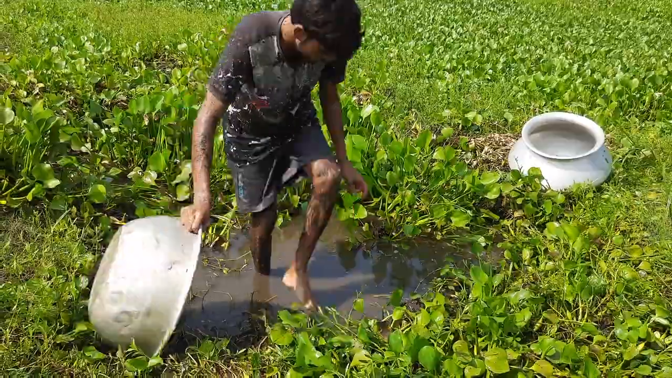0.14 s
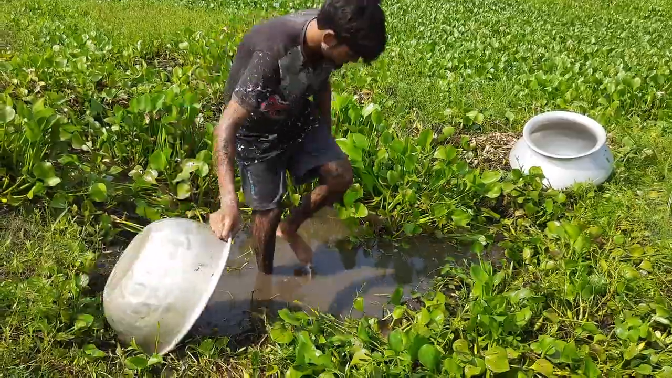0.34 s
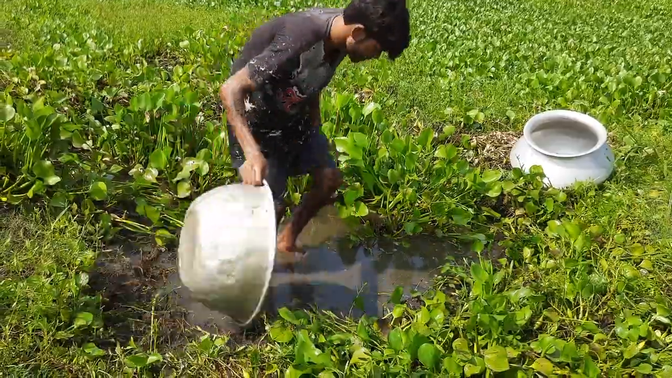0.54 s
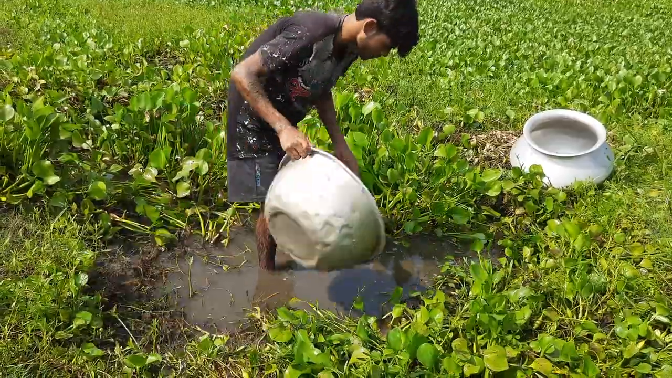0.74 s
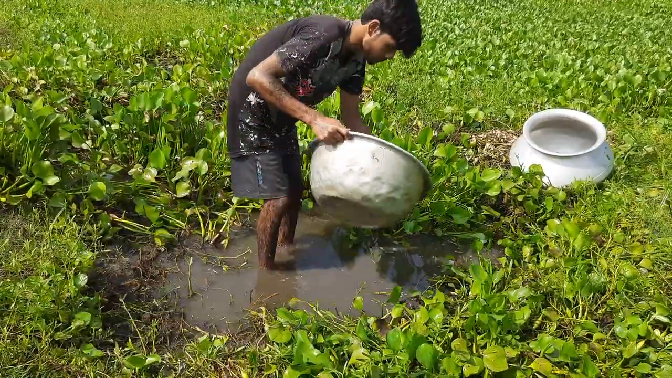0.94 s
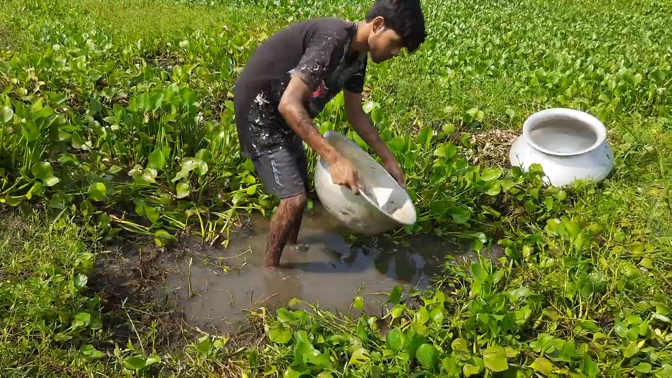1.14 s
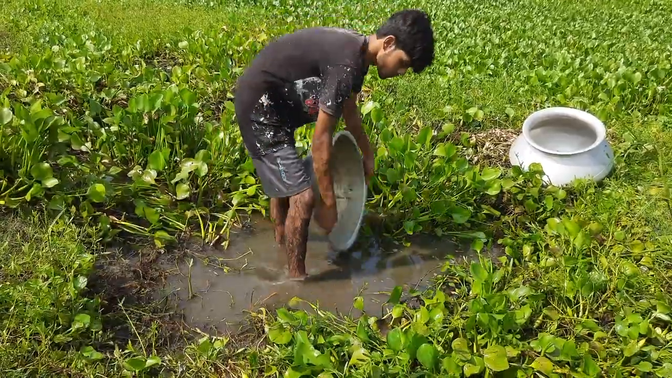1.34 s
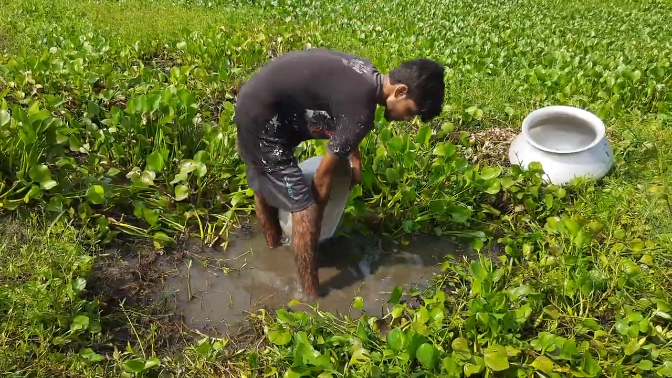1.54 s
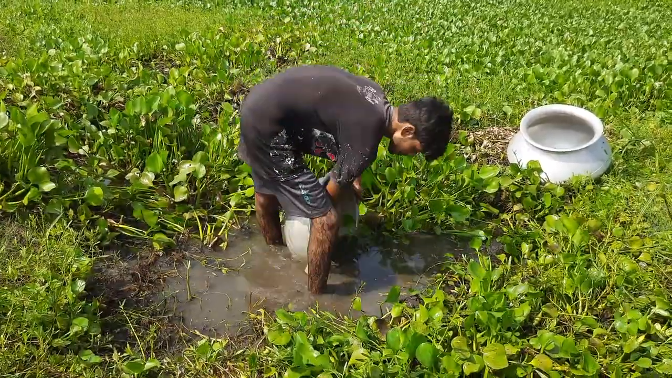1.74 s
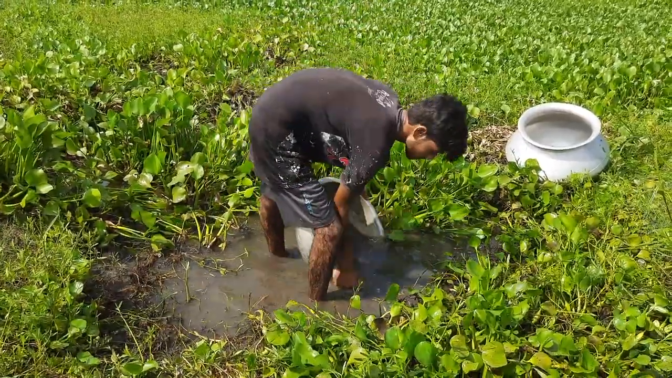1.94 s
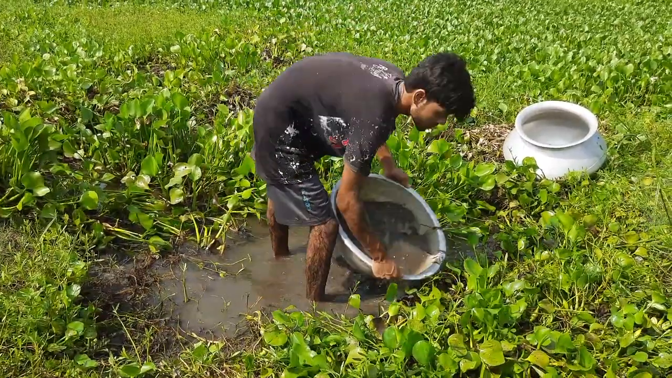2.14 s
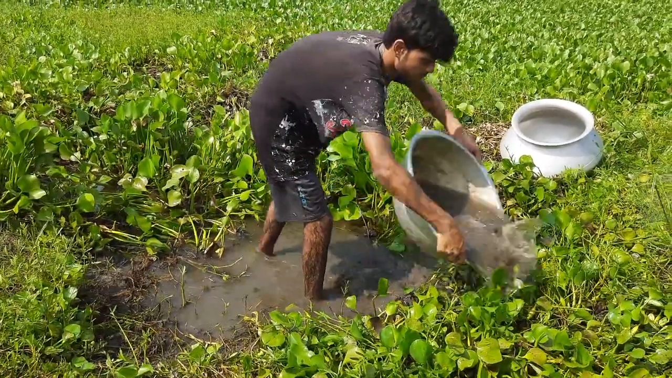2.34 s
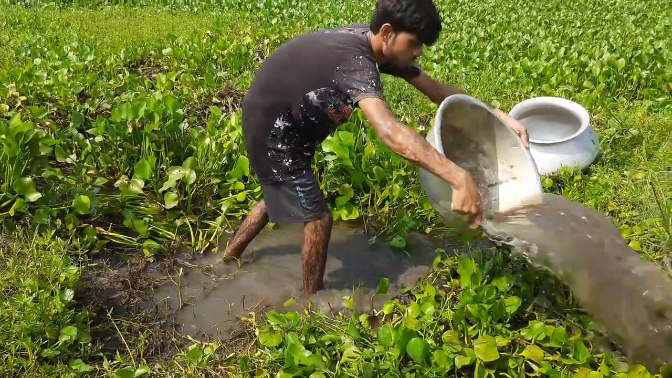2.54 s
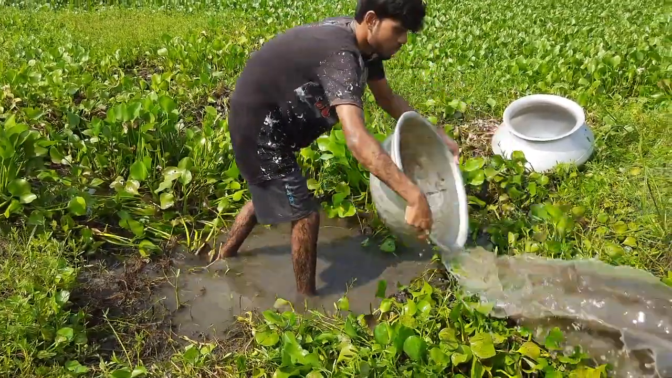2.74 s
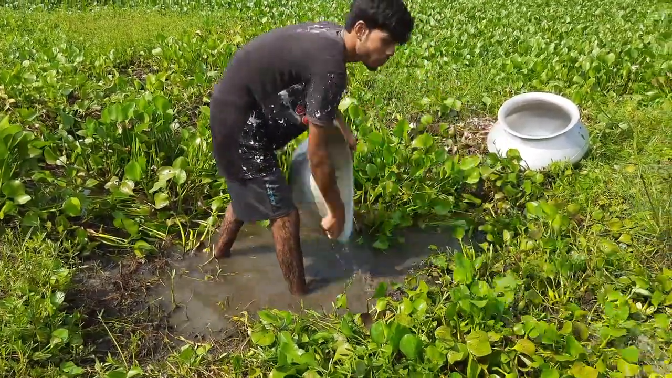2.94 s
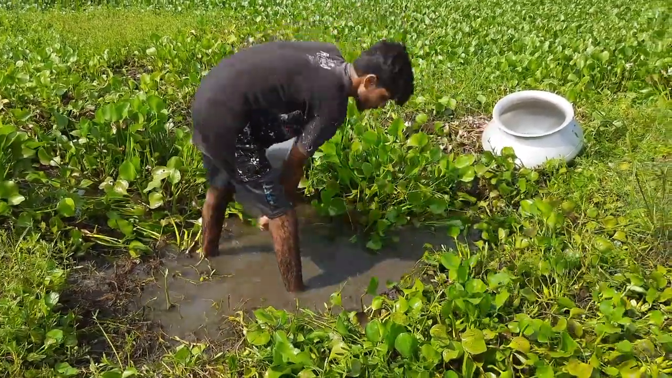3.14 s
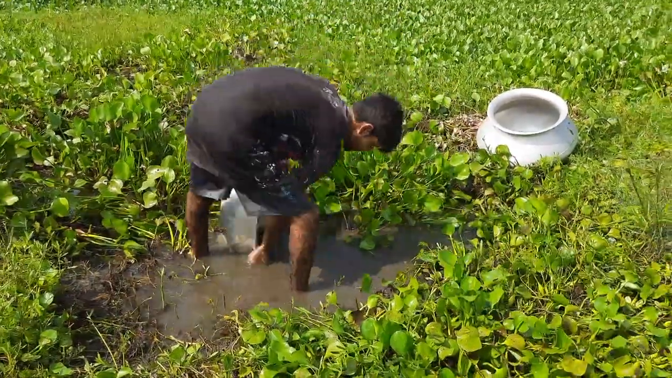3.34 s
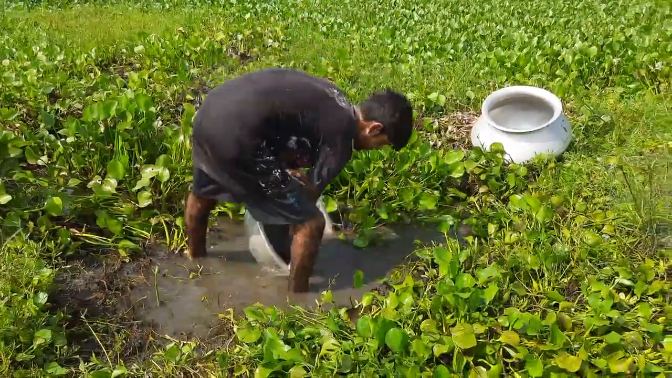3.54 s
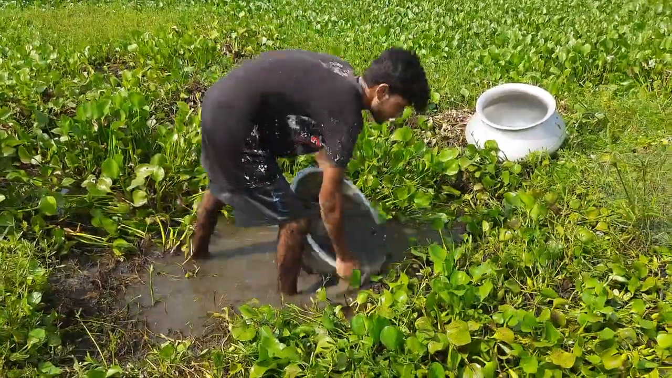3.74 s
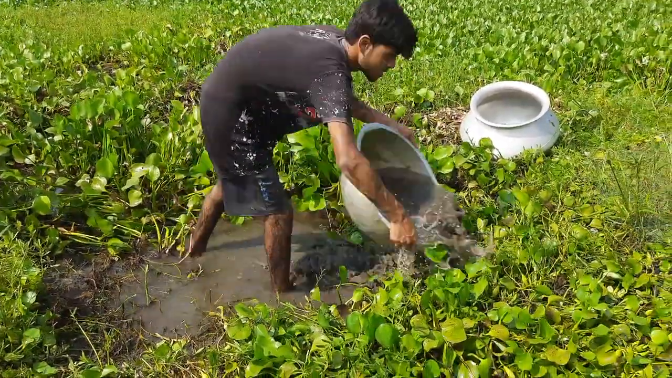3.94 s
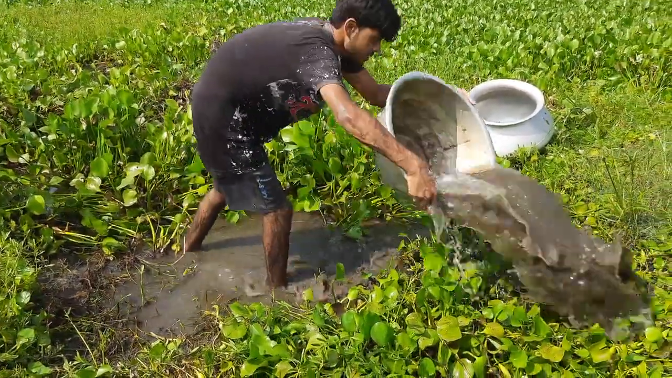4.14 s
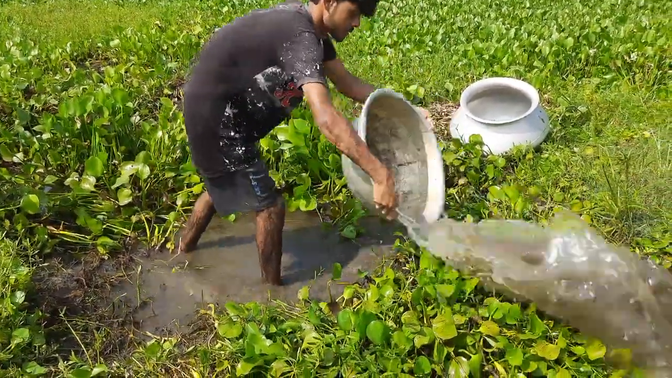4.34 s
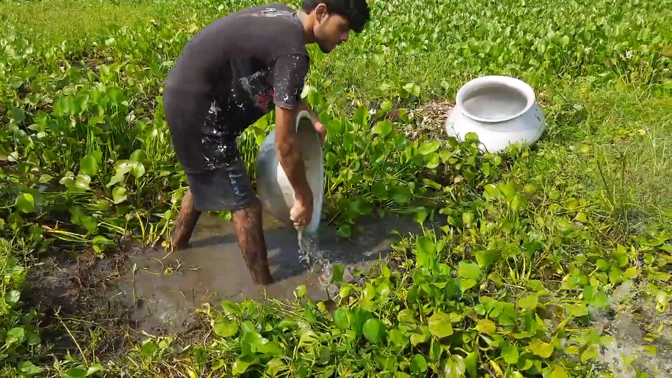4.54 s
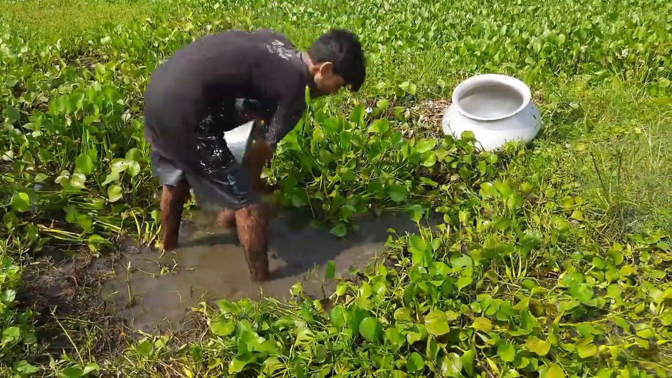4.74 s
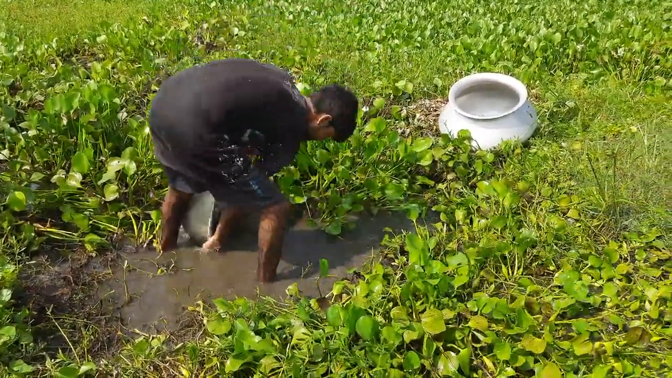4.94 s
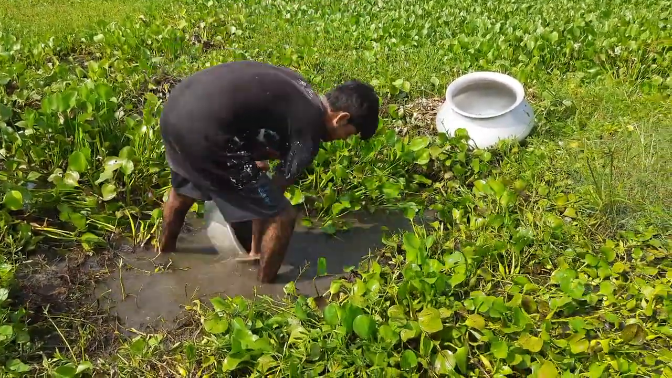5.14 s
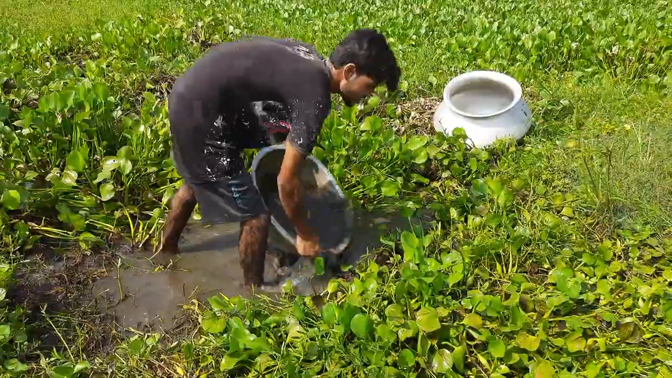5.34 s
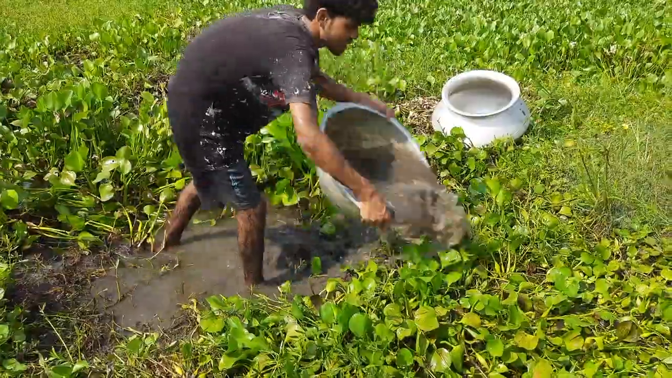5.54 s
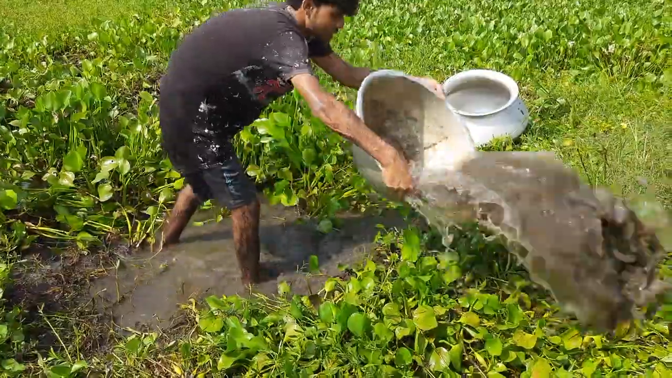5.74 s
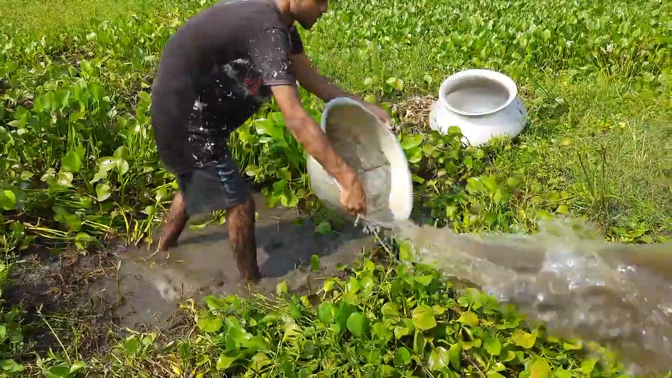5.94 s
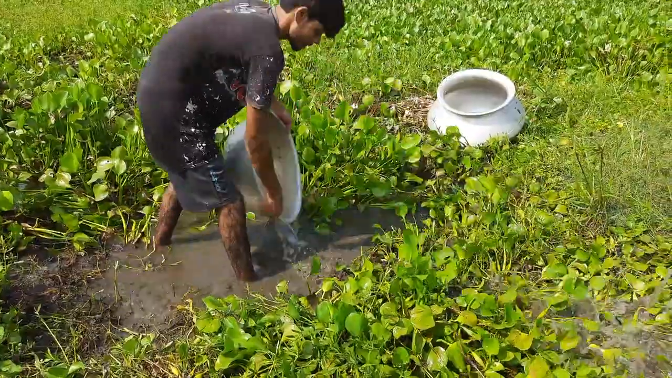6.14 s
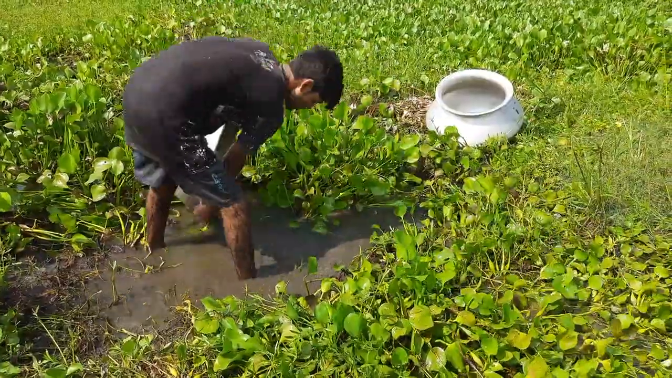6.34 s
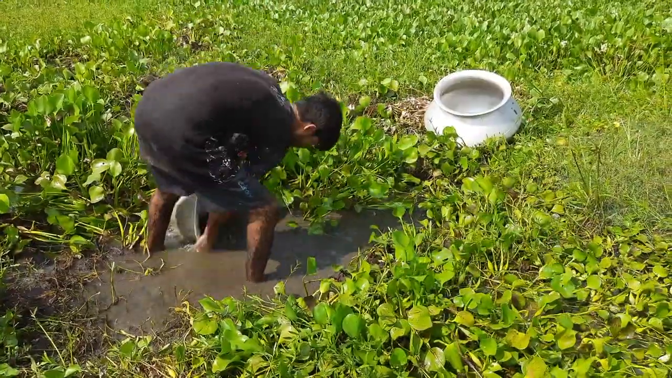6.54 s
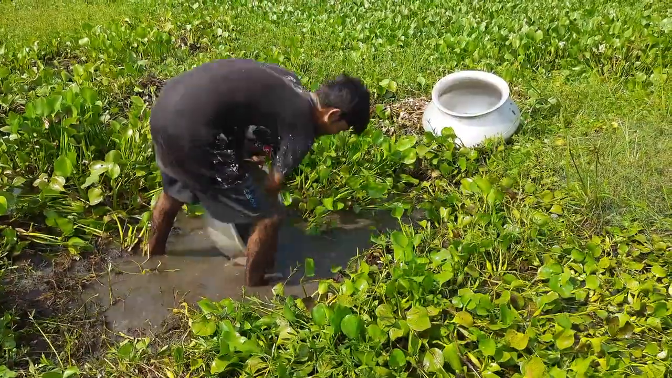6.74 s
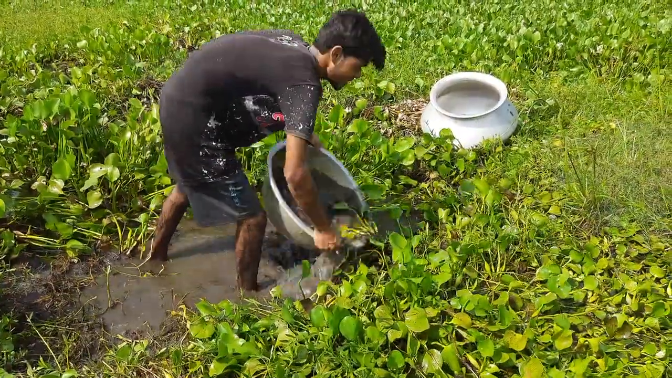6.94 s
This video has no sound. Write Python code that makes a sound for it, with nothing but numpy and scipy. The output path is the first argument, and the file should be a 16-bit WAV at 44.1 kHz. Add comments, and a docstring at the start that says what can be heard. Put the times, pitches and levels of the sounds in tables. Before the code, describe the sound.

Open country air with a faint hush, low uneven wind bumping the microphone and a few tiny far bird whistles in the first quarter second. From 0.4 s feet shift softly in mud; around 0.8 s the empty thin metal basin knocks dully, with lighter taps at 1.2 and 1.8 s among small wet slaps. At about 2.0 s the rim digs in and water gurgles into it; at 2.4 s it slops over with ringing plops. A sheet of water swells from 2.8 s, rattles over broad leaves and slams down near 3.0 s, draining in hissing spatter. The second scoop bubbles at 3.6 s, slops at 3.95 s and lands heavily at 4.6 s. The third dips at 5.15 s, spills at 5.6 s and crashes at 6.15 s, the loudest spray. Bird chirps return from 6.5 s as a fourth dip gurgles at 6.7 s and slops at 7.1 s. Close, dry stereo.

```python
"""A shallow muddy pool outdoors: someone stands in it and bails it out with an aluminium basin.
The empty basin knocks, then dips, fills and slops over: metal modes, and bubble clouds over noise.
Three loads are thrown: each sheet rattles over broad leaves, slams down and drains away.
Slaps are noise bursts, plops and dull thuds single rising rings; a far bird whistles over a hush
and low wind."""
import sys
import numpy as np
from scipy import signal
from scipy.fft import rfft, irfft, next_fast_len
from scipy.io import wavfile
from scipy.ndimage import uniform_filter1d, map_coordinates

SR = 44100
rng = np.random.default_rng(int(sys.argv[2]) if len(sys.argv) > 2 else 0)


def unload_wav(signal):
    """Save mono or channel-first audio to the path in sys.argv[1] as 16-bit WAV at rate SR, clipped to [-1, 1]."""
    wavfile.write(
        sys.argv[1],
        SR,
        np.round(np.clip(np.atleast_2d(signal).T, -1, 1) * 32767).astype(np.int16),
    )


N = 312669

# Wind at the microphone. Each row: time in seconds, relative level in dB.
WIND_LEVELS = [(0.0, -59), (0.75, -52.5), (1.64, -51), (1.87, -44), (2.41, -54), (2.74, -44.5), (3.41, -53),
               (4.6, -53.5), (4.82, -57), (5.13, -52.5), (5.45, -62), (6.0, -62), (6.16, -56),
               (6.71, -57.5), (6.99, -53.5), (7.09, -60)]
# Bird notes. Each row: start in seconds, length in seconds, start pitch in Hz, level in dB.
CHIRPS = [(0.015, 0.015, 2850, -50), (.053, .03, 2820, -43.5), (0.072, .022, 2480, -54),
          (.156, .035, 2520, -57), (.226, 0.06, 2480, -60), (6.546, .025, 2870, -42),
          (6.798, 0.048, 2950, -43.5), (6.88, 0.078, 2960, -49), (7.012, .02, 2660, -39.5)]
# Feet shifting in mud and wet weeds, and the basin touching the water.
# Each row: start in seconds, length in seconds, relative level in dB, extra gurgle in dB.
STEPS = [(.43, 0.17, -0.5, -11), (0.652, 0.15, 2, -6), (1.15, 0.17, -6.5, 4), (1.488, 0.025, 0.5, 3.5),
         (1.596, 0.089, 7.5, -5.5), (1.754, 0.025, 2, 6), (4.894, 0.28, 8, -23)]
# The rim digs in and water rushes into the basin.
# Each row: start in seconds, filling in seconds, relative level in dB, extra gurgle in dB.
DIPS = [(1.97, 0.19, -4, -4), (3.59, 0.089, 2, -0.5), (5.14, 0.079, 0.5, 0.5), (6.709, 0.017, 0, 1)]
# The full basin is swung up and slops over.
# Each row: start in seconds, spilling in seconds, relative level in dB, extra gurgle in dB.
SPILLS = [(2.37, 0.072, -5.5, -8), (3.949, 0.061, 1.5, 0), (5.569, 0.17, -0.3, 4.5), (7.07, .05, -8, -8)]
# Single bubbles and gulps; the lowest are dull thuds of feet or bumps of wind.
# Each row: start in seconds, relative peak in dB, pitch in Hz, life in cycles.
PLOPS = [(0.447, -26.5, 91, 7), (.872, -15, 105, 2.4), (1.658, -19.5, 245, 8.6), (1.837, -33, 1340, 14),
         (1.946, -28, 190, 10.6), (2.121, -29.5, 140, 5.6), (2.207, -27, 90, 7.3), (2.415, -14.5, 1290, 25),
         (2.464, -28, 1124, 23), (2.491, -30.5, 1420, 33), (2.656, -24, 93, 4.7), (2.931, -15, 1400, 35),
         (2.988, -7.5, 1390, 18), (3.55, -29.5, 313, 32), (3.584, -18.5, 677, 17), (3.716, -24, 730, 14),
         (3.86, -20.5, 195, 8), (4.5, -17.5, 296, 12), (5.077, -25, 1070, 13), (5.219, -27.5, 235, 7.7),
         (5.268, -28.5, 346, 18), (5.575, -28, 544, 16), (5.605, -23, 303, 15), (5.635, -20.5, 1020, 20),
         (5.924, -18, 985, 17), (6.722, -22.5, 606, 26), (6.74, -29, 606, 33)]
# Slaps of feet, basin and thrown water.
# Each row: start in seconds, relative peak in dB, centre in Hz, t60 in seconds.
SLAPS = [(.668, -39, 6000, .045), (.721, -34, 3020, 0.11), (0.761, -30, 500, .045), (.811, -33, 300, 0.031),
         (1.179, -30.5, 990, 0.11), (1.248, -41, 3400, .11), (1.739, -30.5, 600, 0.19),
         (1.766, -27, 1010, 0.11), (1.968, -31, 890, 0.16), (2.385, -31.5, 2980, 0.18),
         (3.417, -33.5, 2020, 0.33), (3.585, -26.5, 990, .17), (3.715, -26.5, 2500, .06),
         (3.861, -23.5, 350, 0.17), (4.137, -26, 400, .09), (4.207, -24, 1590, .17),
         (5.003, -26.5, 3820, 0.058), (5.075, -30, 1790, 0.11), (5.154, -17.5, 1200, 0.11),
         (5.392, -32, 1410, .06), (5.721, -25.5, 865, 0.23), (5.839, -27.5, 3600, 0.071),
         (5.999, -20, 700, 0.083), (6.5, -27, 4030, 0.056)]
# Knocks on the basin. Each row: start in seconds, relative level in dB, brightest register in Hz,
# share of the ring time left by the hands.
KNOCKS = [(.762, -25, 600, .2), (.811, -15, 300, 1), (.813, -20.5, 1000, .7), (1.18, -31.5, 1900, .95),
          (1.249, -27.5, 1000, .6), (1.768, -34, 1400, .8), (2.36, -27, 1400, .2)]
# Modes of the basin. Each row: pitch in Hz, relative level in dB, undamped t60 in seconds.
BASIN_MODES = [(200, -2, .07), (248, 0, .08), (323, 1, .21), (463, -10, .15), (571, -7, .3), (640, -12, .1),
               (781, -13, .13), (935, -4, .18), (1010, -14, .22), (1160, -14, .16), (1303, -9, .16),
               (1365, -7, .17), (1495, -10, .27), (1560, -14, .18), (2150, -22, .15), (3386, -25, .1)]
# Loads thrown on the plants. Each row: landing of the bulk in seconds, relative sheet level in dB,
# pouring before it in seconds, run-off after it in seconds, extra heavy water in dB.
THROWS = [(2.973, -0.76, .19, 0.31, -2.1), (4.567, -0.67, 0.31, 0.23, -0.94), (6.155, 0.96, 0.2, .39, -1.5)]
# Landing of each load's bulk, in the order of THROWS. Each row: relative level in dB,
# air pocket pitch in Hz, relative ground thump in dB, spatter in dB.
LANDINGS = [(-10.8, 250, -23, -22), (-10.3, 232, -21, -20), (-11.3, 340, -16, -18.5)]

# Spectra. Each row: frequency in Hz, relative level in dB.
AIR_SPECTRUM = [(88, -4.5), (150, -0.5), (201, -14), (466, -12), (578, -12.5), (1100, -32), (2100, -24),
                (2400, -19), (2870, -23.5), (3620, -24), (4410, -23), (5460, -25.5), (7620, -25),
                (9260, -32), (16000, -32.5)]
WIND_SPECTRUM = [(12, -32), (20, -40), (54, 2), (102, 5), (130, 0), (200, -14), (260, -4), (440, -120)]
GURGLE_SPECTRUM = [(76, -37), (130, -9), (155, -10), (193, -9.5), (312, 4.5), (417, -6.5), (558, -5),
                   (610, 4), (900, -9), (1170, -42), (1980, -120)]
SPLASH_SPECTRUM = [(470, 4), (800, -2), (933, 0.5), (1150, -4), (1390, 1.5), (1590, 0), (1830, -25),
                   (2100, -30), (2730, -38), (4620, -120)]
FIZZ_SPECTRUM = [(1120, -3.5), (1900, -5.5), (2170, -2), (2270, 1), (2440, -11), (2740, -0.5), (2990, -10),
                 (3360, -0.5), (3770, -10.5), (4280, -7.5), (7170, -11.5), (8800, -27.5), (11600, -16.5),
                 (15000, -15), (16000, -27)]
MASS_SPECTRUM = [(53, -28), (90, 0), (150, -6.5), (247, -1), (389, -3), (433, -6), (525, -0.5), (900, -11),
                 (1170, -14), (1980, -120)]
SPLATTER_SPECTRUM = [(470, -11), (800, -1.5), (940, 3), (1250, -4), (1490, 4), (1780, -6.5), (2100, -7),
                     (2730, -14), (4620, -120)]
SPRAY_SPECTRUM = [(1120, -7), (1900, -5), (2530, -6), (2860, -1.5), (3220, -5.5), (3580, -3), (4090, -5),
                  (4430, -4.5), (5340, -5.5), (7500, -11), (9210, -24.5), (12100, -12), (15200, -13.5),
                  (16000, -14.5)]
IMPACT_SPECTRUM = [(40, -48), (120, 2), (220, 6), (400, 7), (520, -9), (900, -9), (1500, -19), (2200, -16),
                   (6000, -57)]
SPATTER_SPECTRUM = [(100, 6), (400, 7.5), (1000, 0.5), (1550, 1), (2100, -13), (4500, -12.5), (7500, -20.5),
                    (9500, -37), (13000, -25)]
# Stereo width. Each row: frequency in Hz, side minus mid in dB.
WIDTH = [(30, -1), (70, -2), (130, -18), (280, -26), (600, -15), (1200, -8.5), (2400, 0), (15000, 0)]
# Colour difference of the microphones. Each row: frequency in Hz, left minus right in dB.
MIC_BALANCE = [(60, -1.5), (120, -1.5), (240, -1), (480, 1.5), (950, -0.5), (1890, 0.5), (3770, -2),
               (7520, -0.5), (15000, 1.5)]

CHIRP_FALL_HZ_PER_S = 2950
LAP_LEAD_S, LAP_S = 0.13, 0.65  # lapping starts before each dip and holds this long
COLLAPSE_S, RUNOFF_END_DB_PER_S = 0.079, 153  # the sheet gives out; the last run-off stops
LOW_CUT_HZ, TOP_HZ = 44, 15900


def amp(db):
    """Amplitude of a level in dB."""
    return 10 ** (np.asarray(db) / 20)


def unit(x):
    """x scaled to rms 1."""
    return x / np.sqrt(np.mean(x ** 2) + 1e-20)


def along(points, hz):
    """(Hz, value) points interpolated on a log axis."""
    f, v = np.transpose(points)
    return np.interp(np.log(hz + 1), np.log(f + 1), v)


def wobble(knots_per_s):
    """A smooth random curve."""
    knots = rng.standard_normal(int(N * knots_per_s / SR) + 4)
    return map_coordinates(knots, [np.arange(N) * knots_per_s / SR], order=2)


def filtered(x, response):
    """x times a response of frequency."""
    n = x.shape[-1]
    m = next_fast_len(n + SR // 10)
    return irfft(rfft(x, m) * response(np.fft.rfftfreq(m, 1 / SR)), m)[..., :n]


def coloured(pair, spectrum):
    """Mid-side pair in a spectrum, mid rms 1; deepest bass and treble wide, lows between near mono."""
    def response(hz):
        return amp(along(spectrum, hz)) * amp([0 * hz, along(WIDTH, hz)])
    shaped = filtered(pair, response)
    return shaped / (shaped[0].std() + 1e-12)


def add(track, start_s, sound):
    """Mix a sound into the track."""
    start = max(round(start_s * SR), 0)
    part = track[..., start:start + sound.shape[-1]]
    part += sound[..., :part.shape[-1]]


def patchy(pair, depth_db, size=7):
    """Uneven texture: short random patches of gain over time and pitch."""
    z = signal.stft(pair, nperseg=512)[2]
    patches = uniform_filter1d(rng.standard_normal(z.shape[1:]), size, 0)
    patches = uniform_filter1d(patches, size - 2, 1)
    return signal.istft(z * amp(depth_db * unit(patches)), nperseg=512)[1][:, :N]


def field():
    """Open air: a faint restless hush and uneven low wind, independent in mid and side."""
    hush = amp(-54) * coloured(patchy(rng.standard_normal((2, N)), depth_db=3.0), AIR_SPECTRUM)
    gusts = amp(3.2 * wobble(14))
    wind_db = np.interp(np.arange(N) / SR, *np.transpose(WIND_LEVELS))
    wind = unit(filtered(rng.standard_normal((2, N)), lambda hz: amp(along(WIND_SPECTRUM, hz))))
    mid_side_gain = amp([[0], [-2.5]])
    return hush + amp(wind_db + 2.0) * gusts * wind * mid_side_gain


def bird(scatter_db=-5, scatter_t60_s=0.7, waver_hz=70):
    """Short falling, wavering whistles, smeared by distant foliage as a decaying noise echo."""
    song, waver = np.zeros(N), waver_hz * wobble(250)
    for start_s, length_s, start_hz, db in CHIRPS:
        n = int(length_s * SR)
        hz = start_hz - CHIRP_FALL_HZ_PER_S * np.arange(n) / SR
        hz = hz + np.roll(waver, -int(start_s * SR))[:n]
        add(song, start_s, amp(db) * np.hanning(n) * np.sin(2 * np.pi * np.cumsum(hz) / SR))
    t = np.arange(SR // 3) / SR
    tail = rng.standard_normal((2, len(t))) * amp(-60 * t / scatter_t60_s)
    echo = signal.fftconvolve(song[None], tail / np.linalg.norm(tail[0]), axes=1)[:, :N]
    return np.array([song, 0 * song]) + amp(scatter_db) * echo


def bubble(cycle, life, rise):
    """A bubble's complex ring against time in cycles: its pitch climbs as it nears the surface."""
    age = cycle / life
    envelope = (1 - np.exp(-12 * age)) ** 2 * amp(-60 * age)
    return envelope * np.exp(2j * np.pi * cycle * (1 + rise * age / 2))


def water(spectrum, bubbles_per_s, low_hz, high_hz, life, spread_db, wash_db, patch_db):
    """A cloud of bubbles of random size and place over the wash of countless smaller ones."""
    when, size, strength, place = rng.random((int(bubbles_per_s * N / SR), 4)).T
    hz = (np.sqrt(low_hz) + size * (np.sqrt(high_hz) - np.sqrt(low_hz))) ** 2
    # big bubbles are rare, and a few of every size ring far louder than the rest
    gain = hz ** (3 / 4) * amp(-spread_db * np.log(np.maximum(strength, np.exp(-4))))
    # all rings laid end to end: owner is the bubble, step the sample within its ring
    length = (life * SR / hz).astype(int) + 1
    owner = np.repeat(np.arange(len(hz)), length)
    step = np.arange(len(owner)) - (np.cumsum(length) - length)[owner]
    ring = gain[owner] * bubble(step * hz[owner] / SR, life, rise=0.3)
    at = (when * N).astype(int)[owner] + step
    mid_side = (ring.imag, ring.real * (place[owner] - .5))
    pair = np.array([unit(np.bincount(at, part, N)[:N]) for part in mid_side])
    wash = rng.standard_normal((2, N)) * np.sqrt(SR / 2 / (high_hz - low_hz))
    return coloured(patchy(pair + amp(wash_db) * wash, patch_db), spectrum)


def swell(start_s, hold_s, rise_db_per_s, fall_db_per_s):
    """Gain of a movement of water: it builds up to its start time, holds and dies away."""
    t = np.arange(N) / SR - start_s
    return amp(rise_db_per_s * np.minimum(t, 0) - fall_db_per_s * np.maximum(t - hold_s, 0))


def stirring():
    """Gains of gurgle, splash and fizz: dips, the lapping around them, spills, steps add in power."""
    def mix(gurgle_db, splash_db, fizz_db):
        return amp([[gurgle_db], [splash_db], [fizz_db]])

    lap_rows = [(start_s - LAP_LEAD_S, LAP_S, db, extra_db) for start_s, _, db, extra_db in DIPS]
    # rows, balance, rise and fall in dB per second
    movements = [
        (DIPS, mix(gurgle_db=-32.5, splash_db=-41, fizz_db=-66), 255, 91),
        (lap_rows, mix(gurgle_db=-50, splash_db=-47.5, fizz_db=-52), 127, 5),
        (SPILLS, mix(gurgle_db=-39.5, splash_db=-34.5, fizz_db=-47.5), 167, 129),
        (STEPS, mix(gurgle_db=-51, splash_db=-54.5, fizz_db=-62.5), 500, 125)]
    parts = []
    for rows, balance, rise, fall in movements:
        for start_s, hold_s, db, extra_db in rows:
            gain = swell(start_s, hold_s, rise, fall)
            parts.append(amp(db) * balance * mix(extra_db, 0, 0) * gain)
    return np.linalg.norm(parts, axis=0)


def scooping():
    """Feet and basin stir the pool: big bubbles gurgle, small ones splash and fizz."""
    gurgle, splash, fizz = stirring()
    slosh = wobble(45)
    big = water(GURGLE_SPECTRUM, bubbles_per_s=165, low_hz=150, high_hz=900, life=17,
                spread_db=2.4, wash_db=-7, patch_db=1)
    small = water(SPLASH_SPECTRUM, bubbles_per_s=380, low_hz=800, high_hz=2100, life=22,
                  spread_db=2.9, wash_db=-3, patch_db=2)
    drops = water(FIZZ_SPECTRUM, bubbles_per_s=2600, low_hz=1900, high_hz=15000, life=20,
                  spread_db=3.7, wash_db=1.5, patch_db=2.6)
    low = amp(-5.5 + 1.6 * slosh) * gurgle * big
    middle = amp(-5.0 + 1.5 * slosh) * splash * small
    high = amp(2.2 + 1.9 * slosh) * fizz * drops
    return low + middle + high


def plops():
    """Single bubbles, gulps and, lowest, dull thuds of feet or bumps of wind: short rising rings."""
    out, t = np.zeros((2, N)), np.arange(SR // 5) / SR
    for start_s, db, hz, life in PLOPS:
        ring = bubble(hz * t, life, rise=0.17)
        ring = amp(db - 5.0) * ring / np.abs(ring).max()
        add(out, start_s, np.array([ring.imag, amp(along(WIDTH, hz)) * ring.real]))
    return out


def slaps(attack_s=0.00088, skirt_db=5.5, soft_hz=7500):
    """Flat contacts with water: a quick burst of broad noise, its top softened by the mud."""
    out, t = np.zeros((2, N)), np.arange(SR // 4) / SR
    hz = np.geomspace(40, TOP_HZ, num=20)
    tilt_db = -2.5 * np.log2(hz) - 13 / (1 + (soft_hz / hz) ** 8)
    for start_s, db, centre_hz, t60_s in SLAPS:
        spectrum = np.c_[hz, tilt_db - skirt_db * np.hypot(np.log2(hz / centre_hz), .7)]
        envelope = (1 - np.exp(-t / attack_s)) * amp(-60 * t / t60_s)
        burst = coloured(rng.standard_normal((2, len(t))), spectrum) * envelope
        add(out, start_s, amp(db - 1) * burst / np.abs(burst[0]).max())
    return out


def basin(focus_db=7, attack_s=0.0024, waver=0.28):
    """Knocks ring thin metal: contact picks a register, hands and water film damp and detune it."""
    out, t = np.zeros((2, N)), np.arange(SR // 2) / SR
    hz, level_db, t60_s = np.transpose(BASIN_MODES)[:, :, None]
    for start_s, db, bright_hz, ring_share in KNOCKS:
        focus = focus_db * np.log2(hz / bright_hz) ** 2 / 2
        weight = amp(level_db - focus + rng.normal(0, 0.63, hz.shape))
        drift = waver * np.cumsum(rng.standard_normal((len(hz), len(t))), axis=1) * np.sqrt(hz / SR)
        phase = 2 * np.pi * (hz * t + rng.random((2, len(hz), 1))) + drift
        decay = amp(-60 * t / (t60_s * ring_share))
        modes = weight / np.linalg.norm(weight) * np.sin(phase) * decay
        ring = (modes * amp([0 * hz, along(WIDTH, hz)])).sum(axis=1)
        add(out, start_s, amp(db + 3.0) * ring * (1 - np.exp(-t / attack_s)))
    return out


def sheet(extras_db, rise_db_per_s, swell_db_per_s, drop_db, drain_db_per_s):
    """Gain of thrown water: first drops, swelling pour, collapse once the bulk is down, run-off."""
    gain = np.zeros(N)
    for (land_s, db, pour_s, runoff_s, _), extra_db in zip(THROWS, extras_db):
        t = np.arange(N) / SR - land_s
        pouring = swell_db_per_s * np.clip(t, -pour_s, 0) + rise_db_per_s * np.minimum(t + pour_s, 0)
        draining = drop_db * np.clip(t / COLLAPSE_S, 0, 1) ** 2 + drain_db_per_s * np.maximum(t, 0)
        ending = RUNOFF_END_DB_PER_S * np.maximum(t - runoff_s, 0)
        gain += amp(db + extra_db + pouring - draining - ending)
    return gain


def throwing():
    """A sheet of water breaks up over the leaves: heavy lumps, splatter and fine spray."""
    heavy_db = [row[-1] for row in THROWS]
    mass = sheet(heavy_db, rise_db_per_s=93, swell_db_per_s=28.5, drop_db=3.5, drain_db_per_s=47.5)
    splatter = sheet(heavy_db, rise_db_per_s=106, swell_db_per_s=5.5, drop_db=3.5, drain_db_per_s=37)
    spray = sheet(np.zeros(len(THROWS)), rise_db_per_s=83, swell_db_per_s=10.5,
                  drop_db=7.0, drain_db_per_s=3.5)
    lumps = wobble(70)
    low = water(MASS_SPECTRUM, bubbles_per_s=480, low_hz=110, high_hz=900, life=10,
                spread_db=3, wash_db=-3, patch_db=1.2)
    middle = water(SPLATTER_SPECTRUM, bubbles_per_s=850, low_hz=800, high_hz=2100, life=17,
                   spread_db=3, wash_db=-3, patch_db=2)
    high = water(SPRAY_SPECTRUM, bubbles_per_s=6500, low_hz=1900, high_hz=15500, life=12,
                 spread_db=3.9, wash_db=0, patch_db=2.3)
    low = amp(-28.5 + 1.07 * lumps) * mass * low
    middle = amp(-31 + 0.67 * lumps) * splatter * middle
    high = amp(-33.0 + 0.42 * lumps) * spray * high
    return low + middle + high


def slams(ground_hz=125, spatter_lag_s=0.013, spatter_t60_s=0.17):
    """The bulk thumps the ground, squeezes a throbbing pocket of air and bursts into spatter."""
    out = np.zeros((2, N))
    t = np.arange(-SR // 10, SR // 3) / SR  # 0 is the landing
    push = np.exp(-(t / .0085) ** 2)
    shock = np.exp(-np.abs(t) / .0095)
    late = t - spatter_lag_s
    burst = np.minimum(amp(60 * late / 0.23), amp(-60 * late / spatter_t60_s))

    def throb(hz):
        return push * np.sin(2 * np.pi * (hz * t + rng.random()))

    for (land_s, *_), (db, pocket_hz, thump_db, spatter_db) in zip(THROWS, LANDINGS):
        thud = coloured(rng.standard_normal((2, len(t))), IMPACT_SPECTRUM) * shock
        sound = amp(db + 2) * thud / np.abs(thud[0]).max()
        sound[0] += amp(db) * throb(pocket_hz) + amp(thump_db) * throb(ground_hz)
        spatter = burst * coloured(rng.standard_normal((2, len(t))), SPATTER_SPECTRUM)
        add(out, land_s + t[0], sound + amp(spatter_db) * spatter)
    return out


def scene(left_lead_s=.00008):
    """All sources together; sound reaches the left microphone a moment sooner."""
    mid, side = field() + bird() + scooping() + plops() + slaps() + basin() + throwing() + slams()
    # half the lead advances the left, half delays the right
    def lead(hz):
        return np.exp(1j * np.pi * left_lead_s * np.array([hz, -hz]))
    return filtered(np.array([mid + side, mid - side]), lead)


def record(dry):
    """Each microphone adds its colour; deepest bass is cut, nothing is kept above the band limit."""
    def response(hz):
        colour = amp(along(MIC_BALANCE, hz) * np.array([[.5], [-.5]]))
        low_cut = 1j * hz / (LOW_CUT_HZ + 1j * hz)
        return colour * low_cut * (hz < TOP_HZ)
    return filtered(dry, response)


dry = scene()
out = record(dry)
unload_wav(out)
```